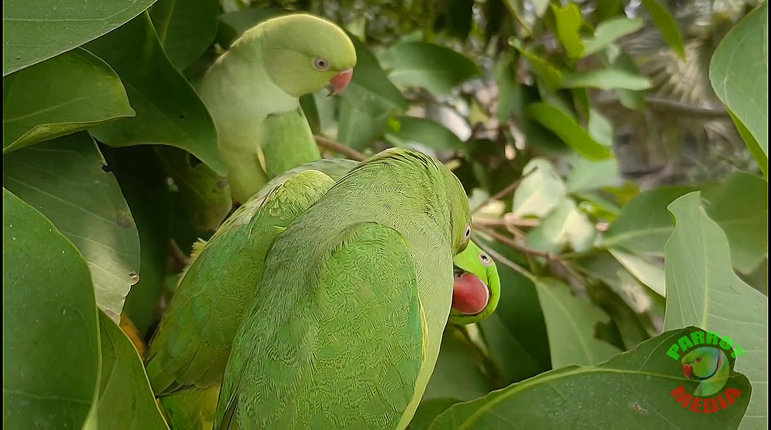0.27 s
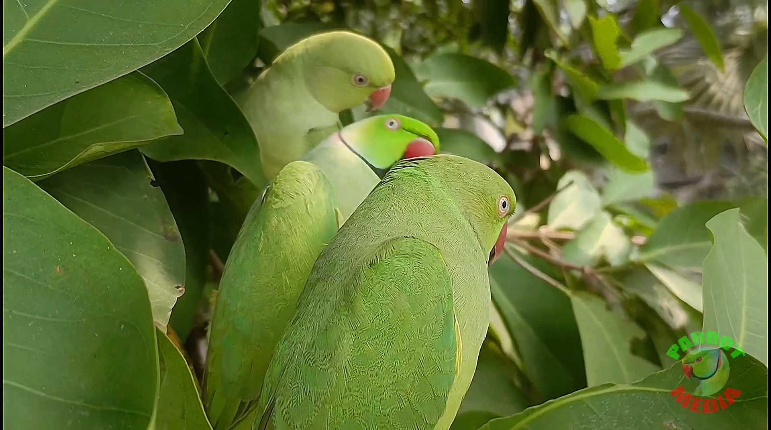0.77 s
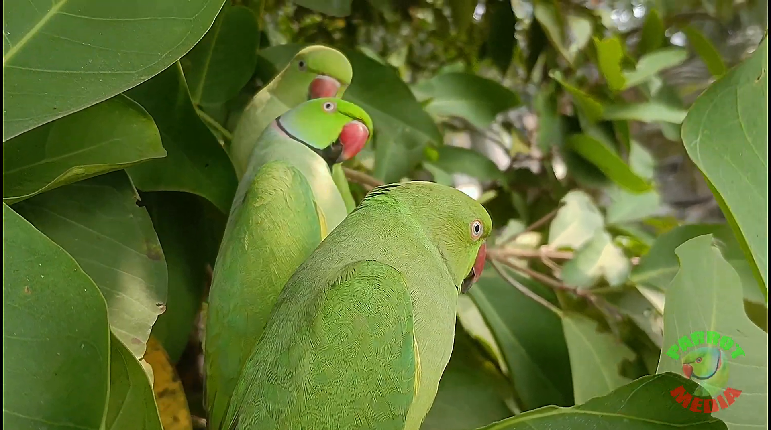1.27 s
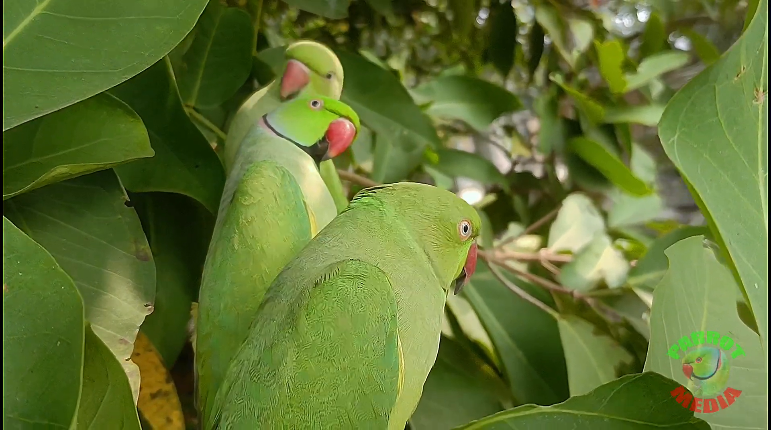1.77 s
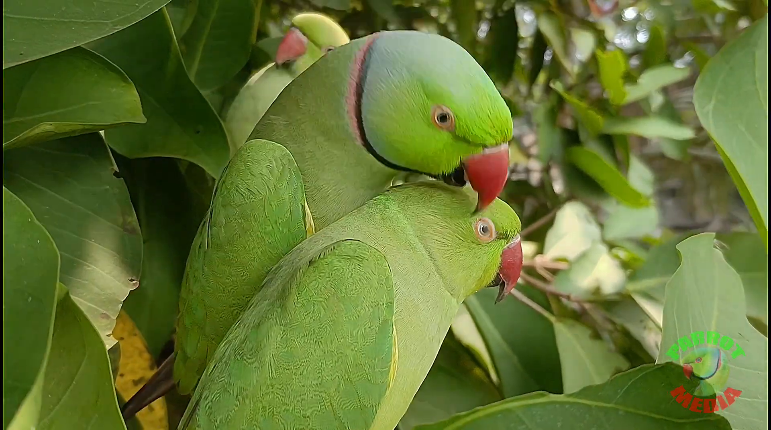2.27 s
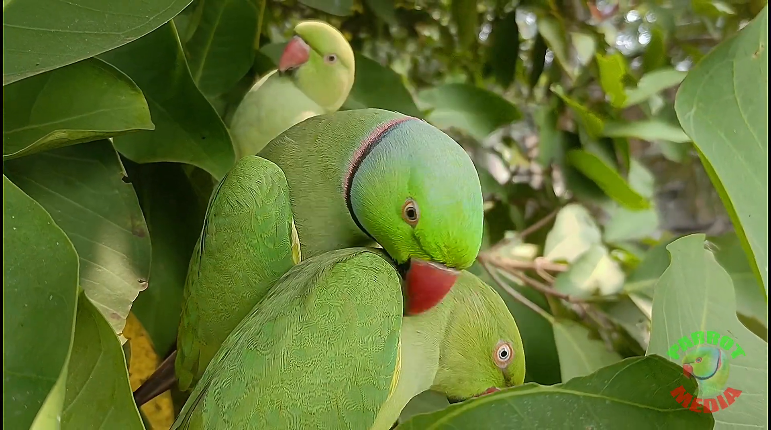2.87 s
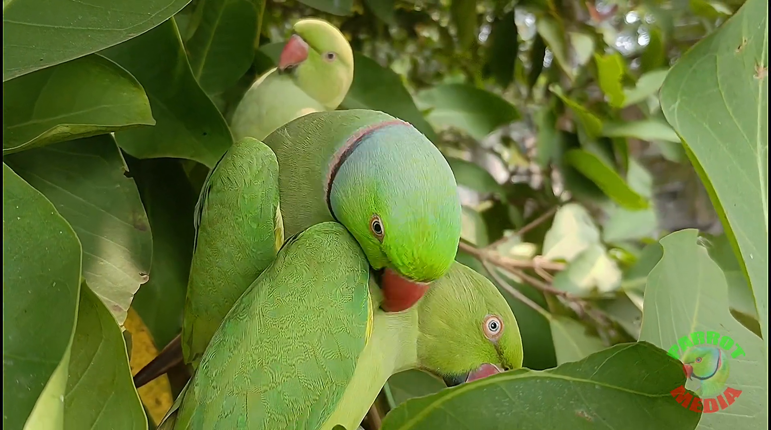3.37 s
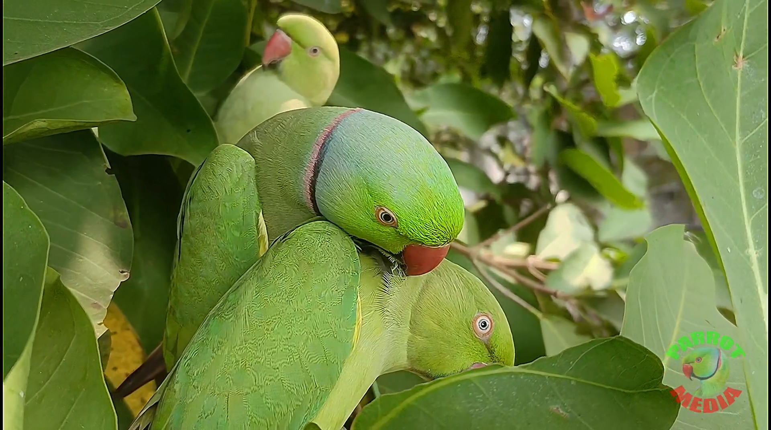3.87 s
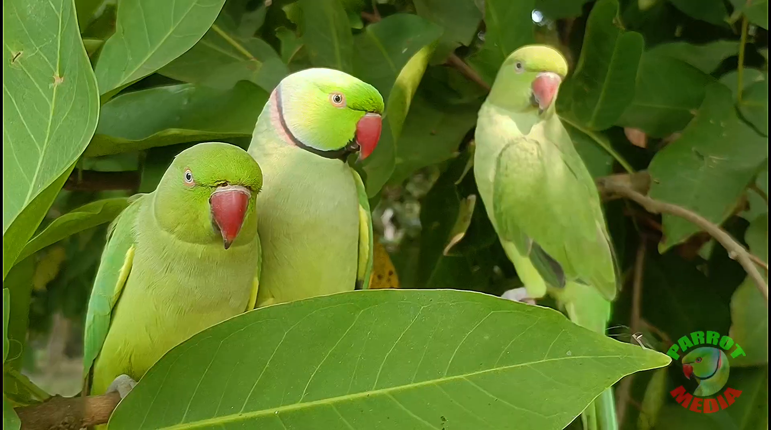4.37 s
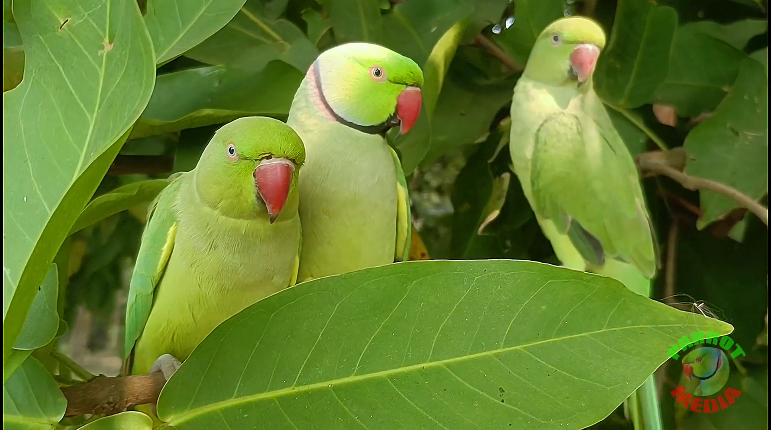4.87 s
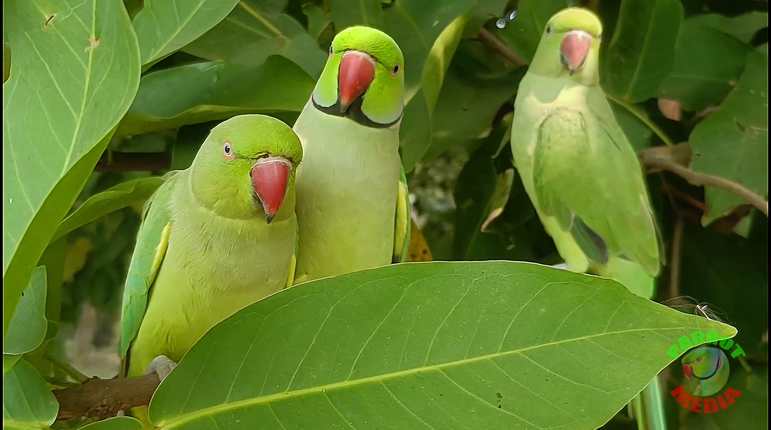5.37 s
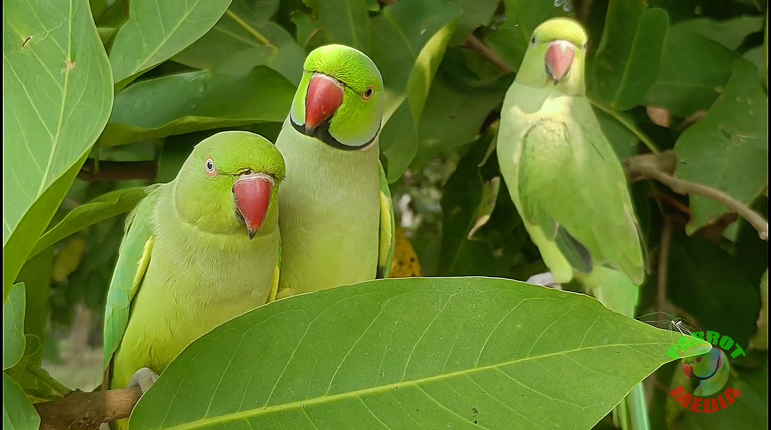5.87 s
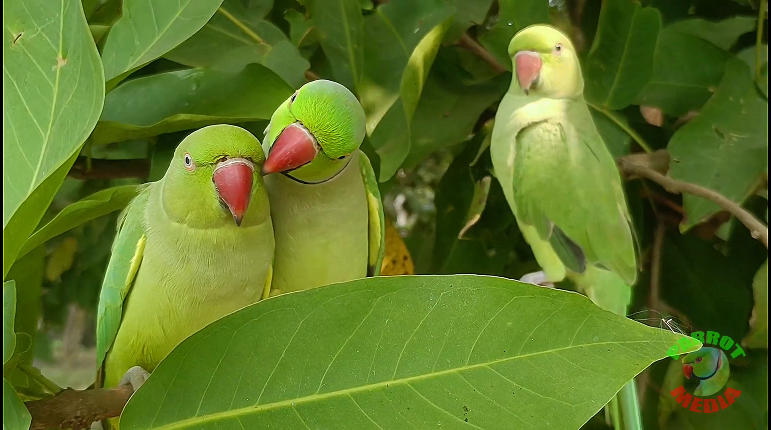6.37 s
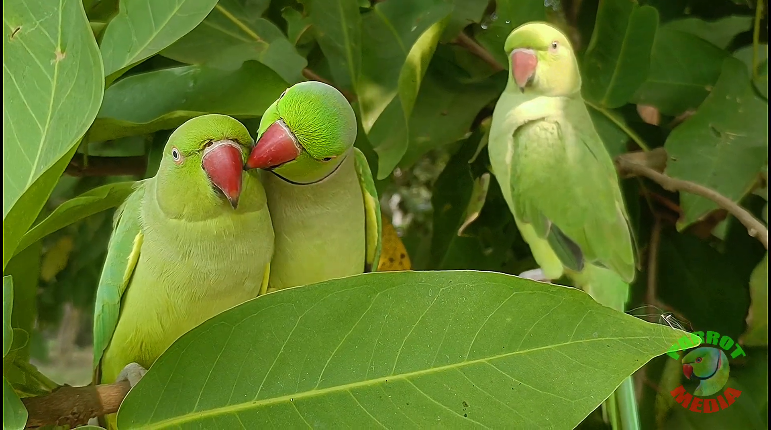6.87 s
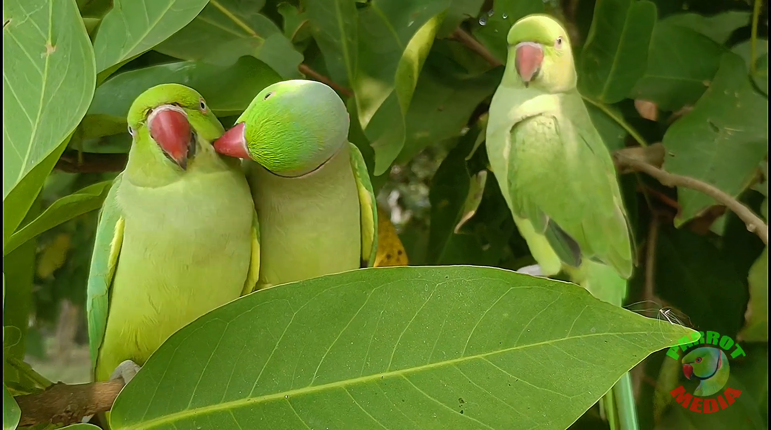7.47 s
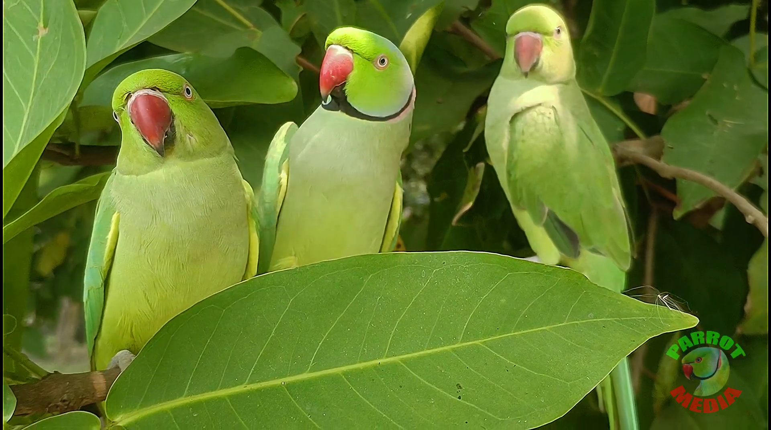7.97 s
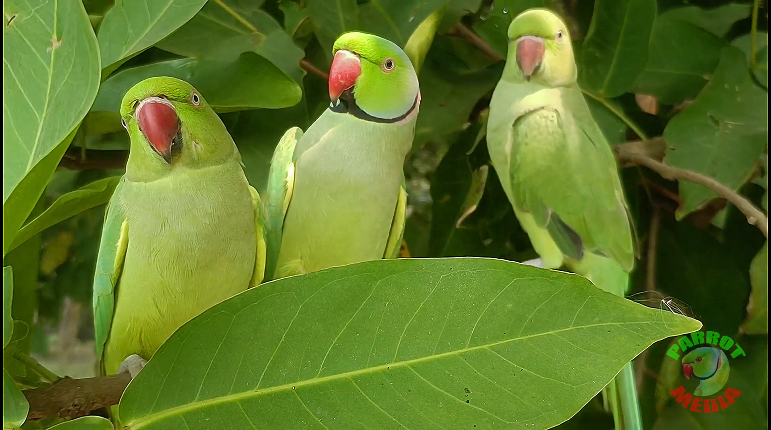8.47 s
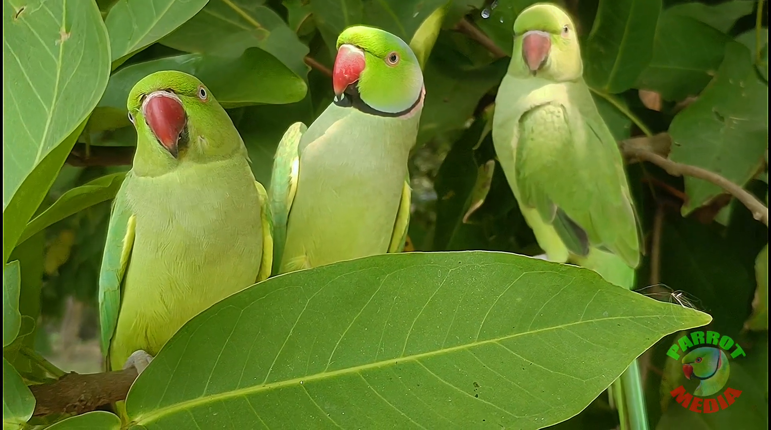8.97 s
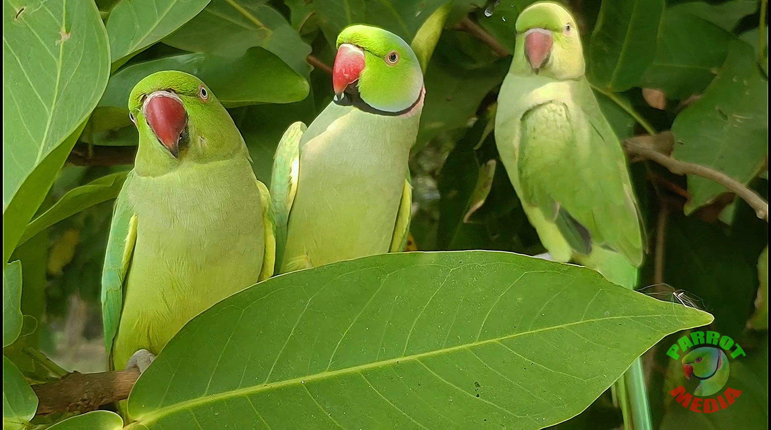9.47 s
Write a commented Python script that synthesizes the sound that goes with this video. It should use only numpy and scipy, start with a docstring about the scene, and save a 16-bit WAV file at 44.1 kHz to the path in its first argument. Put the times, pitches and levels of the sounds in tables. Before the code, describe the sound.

Parakeets call near the microphone in a tree, with little echo. First come a soft murmur, three quick harsh squawks and a climbing squeal, then a couple of seconds of rattling, whistling and croaking. They fall quiet, then return with two murmurs and another three squawks. Faint high chirps from small far birds, a light leafy hiss and a low outdoor rumble run underneath and remain at the end.

```python
"""Parakeets call close by in a leafy tree; low rumble and small far birds run throughout.
From 0.3 s: a murmur, three harsh squawks, a rising squeal. From 2 to 4 s: a murmur, then dry rattles,
thin whistles and croaks. From 6.5 s: two murmurs, three more squawks; then the far birds alone.
A parakeet's syrinx buzzes with a puff of turbulence per cycle; throat and beak colour both,
and the leaves scatter the call. The small birds are gliding near-sines."""
import sys
import numpy as np
from scipy import signal
from scipy.fft import rfft, irfft, next_fast_len
from scipy.io import wavfile
from scipy.ndimage import uniform_filter1d

SR = 44100
rng = np.random.default_rng(int(sys.argv[2]) if len(sys.argv) > 2 else 0)


def waveform_to_disk(signal):
    """Save audio, clipped to [-1, 1], as 16-bit WAV at the path in sys.argv[1]."""
    frames = np.transpose(np.atleast_2d(signal))
    scaled = np.clip(frames, -1, 1) * 32767
    samples = np.round(scaled).astype(np.int16)
    wavfile.write(sys.argv[1], SR, samples)


N = 429093
EDGE_HZ = 15800
SPLIT_HZ = 2900  # bright_db = power above this against power below

# swell of far chorus and leaves: time_s, gain_db
CHORUS_SWELL = [(0, 0), (1.1, 0), (1.5, -9), (1.9, -0.5), (4.1, -1.5), (4.5, 0.5), (4.701, -3), (5.3, -6.5),
                (5.9, -1.5), (6.3, -1), (6.9, 3.5), (7.601, -0.5), (8.25, -1), (8.5, -4), (9.1, -9),
                (9.73, -4)]
# throat and beak response in the chatter: freq_hz, gain_db
CHATTER_THROAT = [(350, -6.5), (550, -1), (850, -11), (1450, 2), (1850, -5.5), (2300, -17.5), (2800, -15),
                  (3600, -29.5), (4700, -9), (5700, -22.5), (7200, -26), (9000, -30), (11000, -28),
                  (15500, -60)]


def gain_of(db):
    """Decibels to amplitude."""
    return 10 ** (np.asarray(db) / 20)


def unit_rms(x):
    """Scale to rms 1."""
    return x / np.sqrt(np.mean(x ** 2) + 1e-20)


def spectrum_at(points, hz):
    """Interpolate on a log-frequency axis."""
    f, value = np.transpose(points)
    return np.interp(np.log(hz + 1), np.log(f + 1), value)


def add(mix, start_s, sound):
    """Mix in place at start_s."""
    part = mix[max(round(start_s * SR), 0):][:len(sound)]
    part += sound[:len(part)]


def waver(size, hz):
    """Random wander, rms about 1, rolled off above hz."""
    f = np.fft.rfftfreq(size + 4096, 1 / SR)
    return unit_rms(irfft(rfft(rng.standard_normal(size + 4096)) / np.sqrt(1 + (f / hz) ** 4)))[:size]


def echoes(x, t60_s, damp_hz):
    """Scatter from leaves, trunks and walls: dense decaying taps, treble dying first."""
    taps = rng.standard_normal((2, SR)) * (rng.random((2, SR)) < .1)
    hz, t, spectra = signal.stft(taps, SR, nperseg=256)
    fading = gain_of(-60 * t / t60_s * (1 + hz[:, None] / damp_hz))
    tail = signal.istft(spectra * fading, SR, nperseg=256)[1]
    tail[:, :60] = 0
    return signal.fftconvolve(x[None], tail / np.linalg.norm(tail[0]), axes=1)[:, :N]


def air():
    """Low rumble, alike on both sides, under patchy hiss of leaves and a far chorus."""
    # outdoor noise spectrum: freq_hz, relative_db
    noise_spectrum = [(12, -43.5), (20, -12.5), (70, 0), (161, -5.5), (382, -18), (686, -21.5), (834, -27),
                      (1450, -30), (2540, -26), (2840, -27.5), (4430, -25), (5230, -32), (6540, -30.5),
                      (9390, -38), (15500, -35)]
    # left-right likeness: freq_hz, correlation
    likeness = [(60, 0.98), (180, 0.93), (550, 0.31), (1650, 0.39), (4970, -0.014), (15000, 0.0)]
    frames, hz = N // 512 + 5, np.fft.rfftfreq(2048, 1 / SR)
    left_re, left_im, apart_re, apart_im, patches = rng.standard_normal((frames, len(hz), 5)).T
    patches = unit_rms(uniform_filter1d(uniform_filter1d(patches, size=12, axis=0), size=9, axis=1))
    correlation = np.clip(spectrum_at(likeness, hz), -1, 1)[:, None]
    left = left_re + 1j * left_im
    right = correlation * left + np.sqrt(1 - correlation ** 2) * (apart_re + 1j * apart_im)
    frame_s = np.arange(frames) * 512 / SR
    swell_db = np.interp(frame_s, *np.transpose(CHORUS_SWELL)) * (hz / (hz + 300))[:, None]
    patch_db = 2 * patches * (hz / (hz + 400))[:, None]
    colour = gain_of(spectrum_at(noise_spectrum, hz)[:, None] + swell_db + patch_db)
    noise = signal.istft(np.array([left, right]) * colour, nperseg=2048, noverlap=1536)[1][:, :N]
    return gain_of(-55.5) * unit_rms(noise)


def tweet(length_s, start_hz, end_hz, level_db, rough):
    """One gliding near-sine; rough adds fast pitch wobble."""
    size = int(length_s * SR)
    hz = np.geomspace(start_hz, end_hz, size) * (1 + .069 * rough * waver(size, hz=469))
    tone = np.sin(2 * np.pi * np.cumsum(hz) / SR)
    return gain_of(level_db) * unit_rms(tone * signal.windows.tukey(size, .4))


def small_birds():
    """Distant notes with echo, over a scatter of fainter ones."""
    # one bird's repeated falling note: start_s, level_db
    slurs = [(0.01, -64.5), (4.806, -62.5), (5.005, -60.5), (5.198, -59), (5.398, -60), (5.598, -59.5),
             (5.814, -59), (6.02, -57), (6.242, -57), (6.491, -60), (8.155, -59.5), (8.367, -59.5),
             (8.584, -59.5), (9.721, -50)]
    # short, nearly level pips: start_s, level_db
    pips = [(.09, -63), (1.171, -65), (1.371, -70.5), (1.54, -68.5), (1.73, -65), (5.353, -61), (5.55, -60),
            (5.729, -56), (5.895, -62.5), (6.615, -61.5), (8.1, -64), (9.58, -70.5)]
    # assorted far notes: start_s, length_s, start_hz, end_hz, level_db, rough
    far_notes = [(1.648, 0.12, 3355, 3600, -69.5, 0.25), (1.716, .08, 5150, 5870, -65.5, 0.93),
                 (4.406, 0.099, 4790, 4200, -60.5, 1.1), (4.771, .023, 3300, 2460, -59, 0.5),
                 (4.87, 0.096, 3070, 2440, -67, 0.3), (4.908, .07, 6750, 6200, -64.5, .85),
                 (6.189, 0.1, 2695, 2260, -67, .05), (6.384, .08, 3760, 4850, -62, 0.3),
                 (6.72, 0.1, 6700, 5880, -62.5, 0.56), (8.114, .073, 3270, 3050, -63.5, .6)]
    # low sinking hoots: start_s, length_s, level_db
    hoots = [(3.166, .13, -68), (3.994, .27, -72.5), (4.816, .28, -76), (6.256, .17, -75),
             (7.946, .36, -76)]
    # quick rising chips: start_s, level_db
    chips = [(7.723, -64), (7.955, -64), (8.881, -66.5), (9.16, -70), (9.481, -70.5)]
    falling, others, faint = np.zeros(N), np.zeros(N), np.zeros((2, N))
    for start_s, level_db in slurs:
        note = tweet(.13, start_hz=4950, end_hz=2650 * rng.uniform(.9, 1.1), level_db=level_db, rough=.27)
        fade_db = np.linspace(2.5, rng.uniform(-9, -1.2), len(note))
        add(falling, start_s - .004, note * gain_of(fade_db))
    for start_s, level_db in pips:
        add(others, start_s, tweet(.036, start_hz=4350, end_hz=4700, level_db=level_db, rough=.28))
    for start_s, level_db in chips:
        add(others, start_s, tweet(.036, start_hz=3050, end_hz=4260, level_db=level_db, rough=.6))
    for start_s, *note in far_notes:
        add(others, start_s, tweet(*note))
    for start_s, length_s, level_db in hoots:
        add(others, start_s, tweet(length_s, start_hz=740, end_hz=610, level_db=level_db, rough=.2))
    for when, length, pitch, glide, loud, side in rng.random(size=(110, 6)):
        start_s, hz = when * N / SR, 2900 + 1700 * pitch
        level_db = -75 + 7 * loud + np.interp(start_s, *np.transpose(CHORUS_SWELL))
        note = tweet(.025 + .05 * length, hz, hz * (.88 + .2 * glide), level_db, rough=.15)
        add(faint[int(2 * side)], start_s, note)
    from_right = np.array([np.roll(falling, 20), falling])
    garden = gain_of(-2.5) * echoes(falling + others + faint.sum(0), t60_s=.75, damp_hz=14000)
    return from_right + gain_of(-1.5) * others + faint + garden


def throat_phase(throat, hz):
    """Minimum phase of the throat, so each pulse rings; treble arrives slightly late, smearing it."""
    grid_hz = np.fft.rfftfreq(2048, 1 / SR)
    log_gain = np.log(gain_of(spectrum_at(throat, grid_hz)))
    ring_rad = -signal.hilbert(np.r_[log_gain, log_gain[-2:0:-1]]).imag[:len(grid_hz)]
    smear_rad = np.pi * .0009 * grid_hz ** 2 / 5000  # pulses sound less spiky
    return np.interp(hz, grid_hz, ring_rad - smear_rad)


def noisiness(hz):
    """Weight of turbulence against buzz; takes over in the high treble."""
    return hz / (hz + 800) * (.5 + .4 * (hz / 4000) ** 3)


def voice(hz, level_db, bright_db, throat, jitter, rasp_db, flutter):
    """Syrinx buzz plus a turbulent puff per cycle, both coloured by throat and beak."""
    size = len(hz)
    f = np.fft.rfftfreq(2 * size, 1 / SR)
    cycles = np.cumsum(hz * (1 + jitter * waver(size, hz=334))) / SR
    k = np.arange(1, int(EDGE_HZ / hz.min()) + 1)[:, None]
    harmonic_hz = k * hz
    heights = gain_of(spectrum_at(throat, harmonic_hz)) * (harmonic_hz < EDGE_HZ)
    # small tongue and beak moves make upper harmonics come and go
    drift = np.array([waver(size, hz=28) for _ in k])
    heights *= gain_of(2.4 * drift * np.minimum(harmonic_hz / 4000, 1))
    rasp = gain_of(rasp_db) * np.ones(size)
    clean = 1 / np.sqrt(1 + (rasp * noisiness(harmonic_hz)) ** 2)
    buzz = (clean * heights * np.cos(2 * np.pi * k * cycles + throat_phase(throat, harmonic_hz))).sum(0)
    buzz *= 1 + flutter * waver(size, hz=420)
    puff_shape = .2 + np.exp(-(cycles % 1) / .34)
    puffs = unit_rms(rng.standard_normal(size) * puff_shape) * rasp * np.sqrt(SR / hz) / 2
    colour = gain_of(spectrum_at(throat, f)) * noisiness(f)
    colour /= np.sqrt(1 + (rasp.mean() * noisiness(f)) ** 2)
    spectrum = rfft(buzz, 2 * size) + rfft(puffs, 2 * size) * colour
    spectrum /= 1 + (.65 * hz.min() / (f + 1)) ** 8  # cut below the fundamental
    # opening the beak shifts power from the low resonance to the high ones
    upper = 1 / (1 + (SPLIT_HZ / (f + 1)) ** 12)
    upper_share = 1 / (1 + gain_of(-bright_db) ** 2)
    out = 0
    for band, share in ((1 - upper, 1 - upper_share), (upper, upper_share)):
        part = irfft(spectrum * band)[:size]
        power = abs(uniform_filter1d(part ** 2, size=300)) + 1e-7
        out = out + part * np.sqrt(share / power)
    return out * gain_of(level_db)


def beats(rows, throat, rise_s, fall_s, jitter, rasp_db):
    """The syrinx opens for a few rough cycles; weak beats shrink to ticks."""
    out, t = np.zeros(N), np.arange(-.008, .016, 1 / SR)
    for peak_s, hz, level_db, bright_db in rows:
        scaled_s = t / np.interp(level_db, [-48, -22], [.45, 1])
        shape = np.where(t < 0, np.exp(-(scaled_s / rise_s) ** 2), np.exp(-abs(scaled_s) / fall_s))
        sound = voice(np.full(len(t), hz), level_db, bright_db, throat, jitter, rasp_db, flutter=.15)
        add(out, peak_s + t[0], shape * sound)
    return out


def rattles():
    """Dry trains of beats that swell and die, the loud ones sinking in pitch; also lone ticks."""
    # beat trains: first_s, peak_s, last_s, peak_db, ends_db, start_hz, end_hz,
    # peak_bright_db, ends_bright_db
    trains = [(0.099, 0.242, .292, -49.5, -58.5, 1200, 1150, 5, -6),
              (2.241, 2.318, 2.4225, -26.5, -38.5, 1360, 1014, -19, -5.5),
              (2.9159, 3, 3.0598, -11, -32.5, 1424, 968.5, 2, -6),
              (3.555, 3.604, 3.682, -14.5, -40, 1277, 995, -3, -2),
              (6.7315, 6.75, 6.9228, -45.5, -49.5, 1130, 1147, 2, 7)]
    # lone beats: peak_s, pitch_hz, level_db, bright_db
    ticks = [(.5864, 1045, -36.5, 7.5), (.7466, 1080, -35, 2.5), (1.1741, 1421, -48, -4),
             (1.221, 1350, -49.5, -5), (2.1778, 1479, -33, -9.5), (2.1886, 1367, -40.5, -5),
             (2.6191, 1308, -46, -11), (2.9272, 1619, -22.5, 6)]
    # throat and beak response: freq_hz, gain_db
    throat = [(500, -28), (850, -8.5), (1100, 0), (1600, 2.5), (2300, -7.5), (3400, -12), (4400, -2.5),
              (5300, -18), (7000, -15.5), (9000, -33), (11000, -25.5), (15500, -39)]
    beats_per_s, pitch_scatter, bright_scatter_db = 50, .066, 3
    rows = list(ticks)
    for first_s, peak_s, last_s, peak_db, ends_db, start_hz, end_hz, *brightness in trains:
        peak_bright_db, ends_bright_db = brightness
        beat_s = np.linspace(first_s, last_s, round((last_s - first_s) * beats_per_s) + 1)
        swell = np.interp(beat_s, [first_s, peak_s, last_s], [0, 1, 0])
        detune, tint = rng.standard_normal((len(beat_s), 2)).T
        hz = np.geomspace(start_hz, end_hz, len(beat_s)) * (1 + pitch_scatter * detune)
        level_db = ends_db + (peak_db - ends_db) * swell
        bright_db = ends_bright_db + (peak_bright_db - ends_bright_db) * swell + bright_scatter_db * tint
        rows.extend(zip(beat_s, hz, level_db, bright_db))
    return beats(rows, throat, rise_s=.0025, fall_s=.0032, jitter=.035, rasp_db=-2)


def gesture(row, fade_curve):
    """Time, pitch, level and brightness of a call; pitch passes a turn (bend 1 straight, 2 round)."""
    start_s, length_s, start_hz, turn_hz, end_hz, turn_after_s, bend = row[:7]
    level_db, fade_db, start_bright_db, end_bright_db = row[7:]
    t = np.arange(0, length_s, 1 / SR)
    from_turn = np.interp(t, [0, turn_after_s, length_s], [1, 0, 1]) ** bend
    hz = turn_hz + (np.where(t < turn_after_s, start_hz, end_hz) - turn_hz) * from_turn
    progress = t / length_s
    bright_db = start_bright_db + (end_bright_db - start_bright_db) * progress
    return start_s + t, hz, level_db + fade_db * progress ** fade_curve, bright_db


def utter(controls, throat, attack_s, release_s, jitter, rasp_db, flutter, attack_rough):
    """One call: hoarsest at the onset, then clearing."""
    t, hz, level_db, bright_db = controls
    clearing_s = .029
    hoarse = 1 + attack_rough * np.exp(-(t - t[0]) / clearing_s)
    rasp_db = rasp_db + 20 * np.log10(hoarse)
    sound = voice(hz, level_db, bright_db, throat, jitter * hoarse, rasp_db, flutter * hoarse)
    opening = np.minimum((t - t[0]) / attack_s, 1) * np.minimum((t[-1] - t) / release_s, 1)
    out = np.zeros(N)
    add(out, t[0], sound * np.sin(np.pi / 2 * opening) ** 1.5)
    return out


def murmur(row, throat):
    """Soft closed-beak call, easing in and out."""
    return utter(gesture(row, fade_curve=2), throat, attack_s=.019, release_s=.017,
                 jitter=.007, rasp_db=-16, flutter=.055, attack_rough=.4)


def squawk(row, throat):
    """A catch of the voice, then a harsh scoop with a louder, brighter onset."""
    catch_lead_s, bite_s = .0112, .016
    resonance_hz, width_hz = 1750, 94
    t, hz, level_db, bright_db = gesture(row, fade_curve=2.09)
    catch = (t[0] - catch_lead_s, hz[0] * .96, level_db[0] - 2, bright_db[0] - 3)
    bite = np.exp(-((t - t[0]) / bite_s) ** 2)
    # darkens as the second harmonic crosses the throat's low resonance
    darken_db = 5 * np.exp(-((2 * hz - resonance_hz) / width_hz) ** 2)
    controls = (t, hz, level_db + 2 * bite, bright_db + 3 * bite - darken_db)
    call = utter(controls, throat, attack_s=.0036, release_s=.016,
                 jitter=.004, rasp_db=-16, flutter=.05, attack_rough=2.4)
    return call + beats([catch], throat, rise_s=.0036, fall_s=.006, jitter=.037, rasp_db=-16)


def squeal():
    """The third squawk breaks into a clearer note that swells as it climbs."""
    # rising call: columns as unpacked in gesture()
    row = (.906, .103, 730, 1370, 1540, .072, 1.6, -26.5, 10, -4, -1.5)
    # throat and beak response: freq_hz, gain_db
    throat = [(700, -13.5), (1100, -9.5), (1500, -1.5), (1900, -15), (2300, -9.5), (2800, -4.5),
              (3400, -11), (4300, -3), (5300, -8.5), (6100, -20.5), (7200, -20.5), (9000, -48),
              (15500, -54.5)]
    return utter(gesture(row, fade_curve=.94), throat, attack_s=.012, release_s=.016,
                 jitter=.004, rasp_db=-19, flutter=.04, attack_rough=.5)


def whistles():
    """Thin, nearly clean notes gliding along smoothed curves."""
    # one curve per whistle: time_s, pitch_hz, level_db, bright_db
    curves = [
        [(2.436, 1844, -24.5, -12.5), (2.474, 1887, -23, -9), (2.505, 1697, -23, -8), (2.532, 1492, -24, -17.5),
         (2.546, 1649, -30, -22.5), (2.556, 1950, -31.5, -25)],
        [(3.091, 1840, -19, -17), (3.118, 1816, -21, -13.5), (3.158, 1654, -21.5, -11.5),
         (3.165, 1789, -18, -12.5), (3.176, 2320, -19, 3), (3.187, 2744, -23.5, 2.5)],
        [(3.7, 1817, -22, -16), (3.732, 1895, -20.5, -11), (3.77, 1731, -21, -12.5), (3.784, 1800, -23, -14),
         (3.806, 2471, -24.5, 15.5), (3.82, 2405, -30, 16), (3.842, 1953, -28, -11), (3.855, 1478, -25, -16)],
    ]
    out = np.zeros(N)
    for curve in curves:
        time_s, *columns = np.transpose(curve)
        t = np.arange(time_s[0], time_s[-1], 1 / SR)
        controls = [uniform_filter1d(np.interp(t, time_s, c), size=400, mode="nearest") for c in columns]
        out += utter([t] + controls, CHATTER_THROAT, attack_s=.0044, release_s=.006,
                     jitter=.0035, rasp_db=-21, flutter=.045, attack_rough=.4)
    return out


def croaks():
    """Hoarse low calls that start hard and fade."""
    # two rising calls, one falling: columns as unpacked in gesture()
    rows = [(2.750, 0.12, 351.6, 747, 905, 0.072, 1, -19.5, -17.5, -5, -1),
            (3.387, 0.11, 409.4, 690, 900, 0.061, 1, -22, -13.5, -5.5, -2),
            (3.869, 0.13, 788, 546.6, 320, 0.059, 1.6, -23.5, -11.5, 0.5, -11)]
    return sum(utter(gesture(row, fade_curve=.9), CHATTER_THROAT, attack_s=.012, release_s=.013,
                     jitter=.01, rasp_db=-10, flutter=.1, attack_rough=1.4) for row in rows)


def perch(x, balance, lead, left_lag_s=.00015):
    """Leaves colour and phase-shift each side differently; sound reaches the left later."""
    size = next_fast_len(N + 512, True)
    f = np.fft.rfftfreq(size, 1 / SR)
    ratio = gain_of(spectrum_at(balance, f))
    phase = np.interp(f, *np.transpose(lead)) - 2 * np.pi * f * left_lag_s
    sides = np.array([ratio * np.exp(.5j * phase), np.exp(-.5j * phase)]) * np.sqrt(2 / (1 + ratio ** 2))
    return irfft(rfft(x, size) * sides, size)[:, :N]


def parakeets():
    """Squawks, chatter, squawks from three near perches, almost dry."""
    # calls: start_s, length_s, start_hz, turn_hz, end_hz, turn_after_s, bend, level_db, fade_db,
    # start_bright_db, end_bright_db
    murmurs = [(.309, 0.096, 730.4, 619.6, 770, 0.049, 2, -32.5, 0, -6.5, -4.5),
               (1.999, 0.091, 402.4, 571, 320, 0.04, 1.9, -29.5, -0.91, -13.5, -0.5),
               (6.487, .089, 371, 523, 280, .049, 1.3, -37.5, -1, -35, -30),
               (6.961, 0.096, 770, 588.6, 820, 0.039, 2.8, -30, -1.2, -8.5, -10)]
    squawks = [(.450, 0.13, 1044, 724.3, 800, .066, 1.7, -19.5, -11.5, 0.5, -.5),
               (.615, 0.12, 1084, 748.6, 850, .075, 1.7, -17, -13.5, 3.5, 0.5),
               (0.776, .140, 1103, 705, 768, .104, 1.7, -16, -16, 6, 1),
               (7.102, 0.12, 1017, 677.3, 800, .064, 2, -19, -12, -4, 0.5),
               (7.263, 0.12, 1048, 697, 799, .072, 1.8, -17, -12, -0.5, 1.5),
               (7.428, .110, 1065, 706, 356, .064, 1.2, -17.5, -17.5, 5, -6.5)]
    # throat and beak responses: freq_hz, gain_db
    murmur_throat = [(350, 3.5), (550, -1.5), (850, -15), (1250, -1), (1900, -12.5), (2500, -11.5),
                     (3300, -20), (4300, -11), (5600, -35), (9000, -37), (15500, -40)]
    first_throat = [(700, -14.5), (1150, -14), (1550, -4), (1900, -5.5), (2350, -31), (2650, -16),
                    (3100, -12.5), (3600, -5.5), (4200, -4), (5200, -6.5), (6300, -19.5), (8000, -13.5),
                    (9400, -42.5), (10800, -30), (12800, -43.5), (15500, -37.5)]
    last_throat = [(450, -7), (700, -14.5), (900, -20.5), (1450, -5.5), (1850, -3), (2300, -25.5),
                   (3000, -11.5), (3900, -6.5), (4900, -4.5), (6000, -23.5), (7500, -25.5), (9000, -28.5),
                   (11000, -30), (15500, -43.5)]
    # each perch's balance through the leaves: freq_hz, left_minus_right_db
    first_balance = [(60, -1.5), (92, -1.5), (140, -2.5), (210, 1.5), (330, -3), (500, 1.5), (770, -5),
                     (1170, -2.0), (1790, -1.5), (2740, -6.5), (4190, 5.5), (6410, -10.5), (9810, 7.5),
                     (15000, -0.5)]
    chatter_balance = [(60, -6.5), (92, -4.5), (140, -2.5), (210, 5), (330, 1), (500, -0.5), (770, -3.5),
                       (1170, -2), (1790, -6), (2740, -11), (4190, 11), (6410, -8.5), (9810, 12.5),
                       (15000, 3)]
    last_balance = [(60, 2), (92, 1.5), (140, -1), (210, 1.0), (330, 1.5), (500, 0.0), (770, 1),
                    (1170, -0.5), (1790, 3), (2740, -15.5), (4190, 9), (6410, -2.5), (9810, 6), (15000, 12)]
    # phase added by the leaves: freq_hz, left_lead_rad
    first_lead = [(0, 0), (700, 0.1), (1500, 0.0), (1900, 0.1), (2400, 1.4), (2900, -0.6), (3400, 0.4),
                  (3900, 0.4), (4500, -0.7), (5200, -1.1), (6200, -2.2)]
    chatter_lead = [(0, 0), (700, 0.2), (1500, 0.1), (1900, 0.2), (2400, 1.6), (2900, 3.8), (3400, 3.2),
                    (3900, 4.7), (4500, 6.8), (5200, 6.3), (6200, 6.6)]
    last_lead = [(0, 0), (700, 0.2), (1500, 0.4), (1900, -0.5), (2400, -2.8), (2900, -3.1), (3400, -2.8),
                 (3900, -2.7), (4500, 0.4), (5200, 0.8), (6200, -0.9)]
    first = murmur(murmurs[0], murmur_throat)
    first += sum(squawk(row, first_throat) for row in squawks[:3]) + squeal()
    last = sum(murmur(row, murmur_throat) for row in murmurs[2:])
    last += sum(squawk(row, last_throat) for row in squawks[3:])
    half_closed_beak = signal.butter(3, 4000, fs=SR)
    chatter = signal.lfilter(*half_closed_beak, murmur(murmurs[1], CHATTER_THROAT))
    chatter += croaks() + whistles() + rattles()
    direct = perch(first, first_balance, first_lead)
    direct += perch(chatter, chatter_balance, chatter_lead)
    direct += perch(last, last_balance, last_lead)
    calls = first + chatter + last
    # a leaf reflects only wavelengths smaller than itself
    treble = signal.lfilter(*signal.butter(1, 4500, "high", fs=SR), calls)
    leaves = gain_of(-6) * echoes(treble, t60_s=.025, damp_hz=30000)
    garden = gain_of(-35.5) * echoes(calls, t60_s=.63, damp_hz=9000)
    return direct + leaves + garden


def scene():
    """Parakeets, far birds and air, in stereo."""
    return parakeets() + small_birds() + air()


def record(dry):
    """Soft peak limit, then low-pass at EDGE_HZ."""
    rounded = dry / (1 + (dry / .68) ** 4) ** .25
    band_limit = signal.firwin(511, EDGE_HZ, window=("kaiser", 9), fs=SR)
    return signal.oaconvolve(rounded, band_limit[None], "same")


dry = scene()
out = record(dry)
waveform_to_disk(out)
```